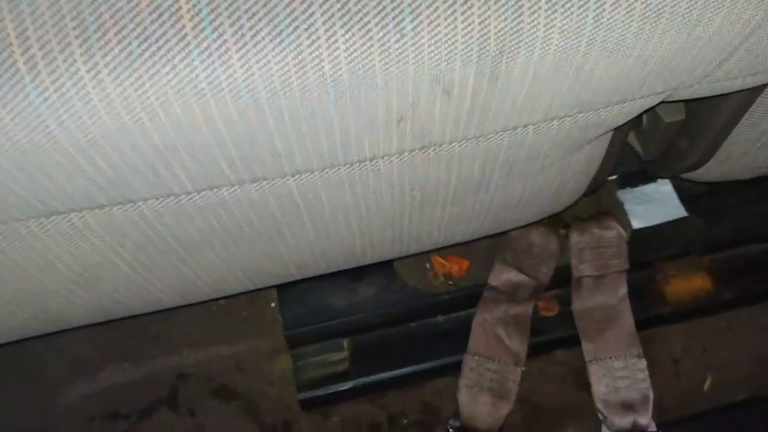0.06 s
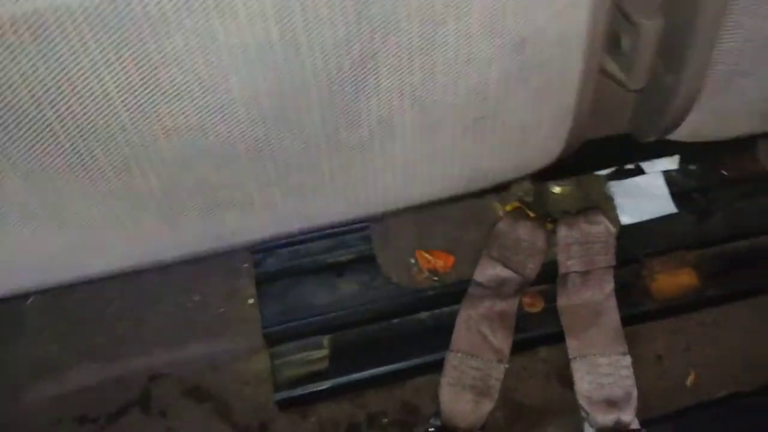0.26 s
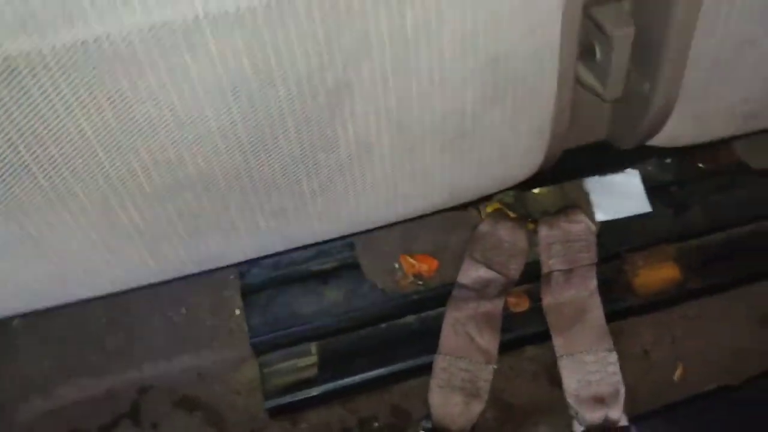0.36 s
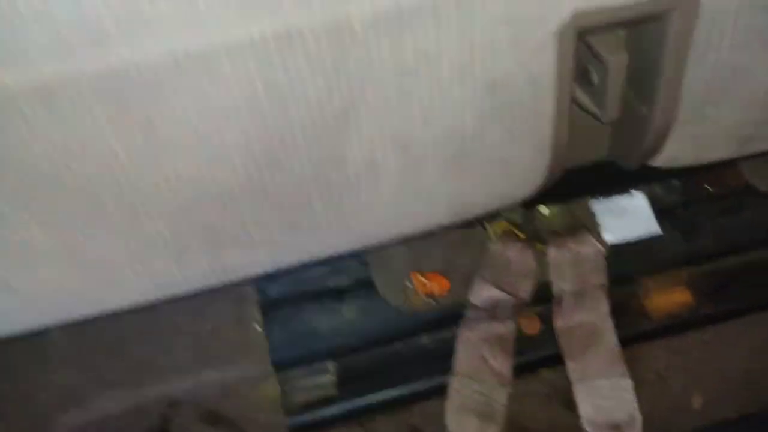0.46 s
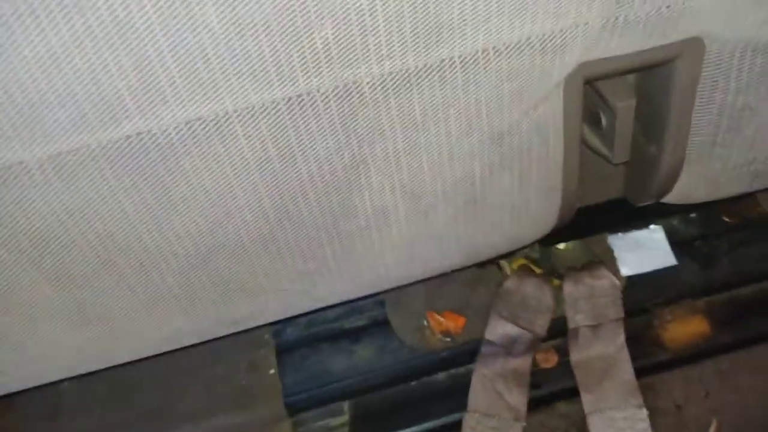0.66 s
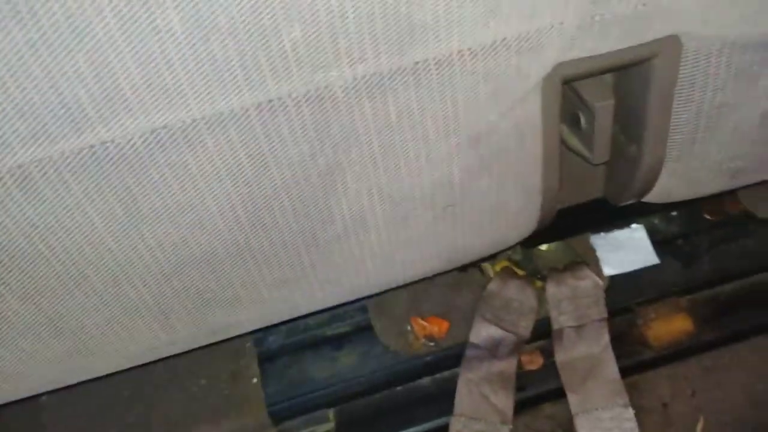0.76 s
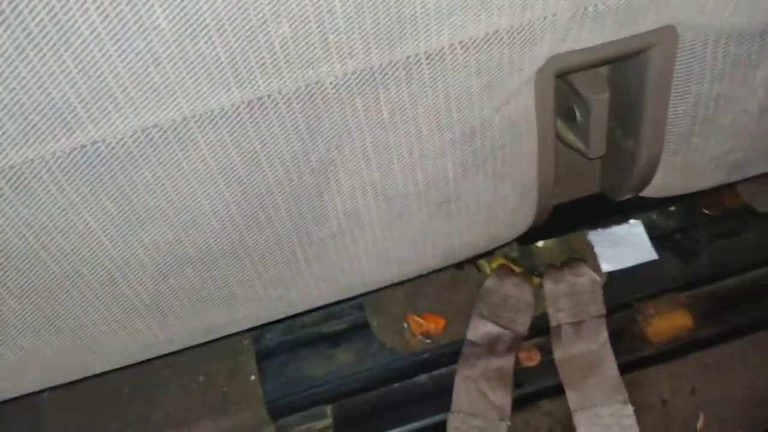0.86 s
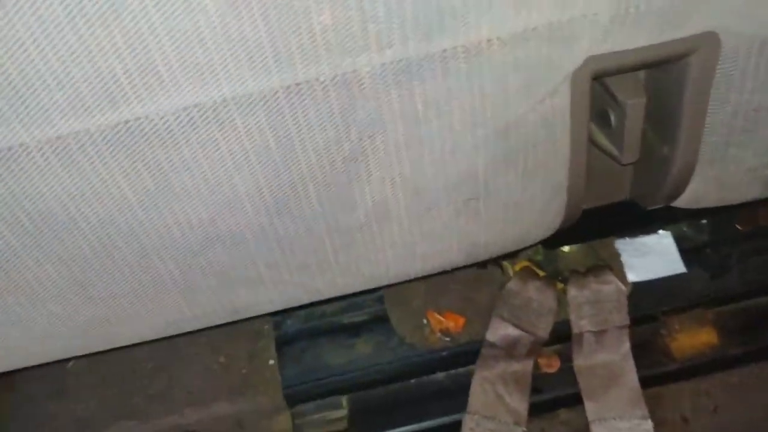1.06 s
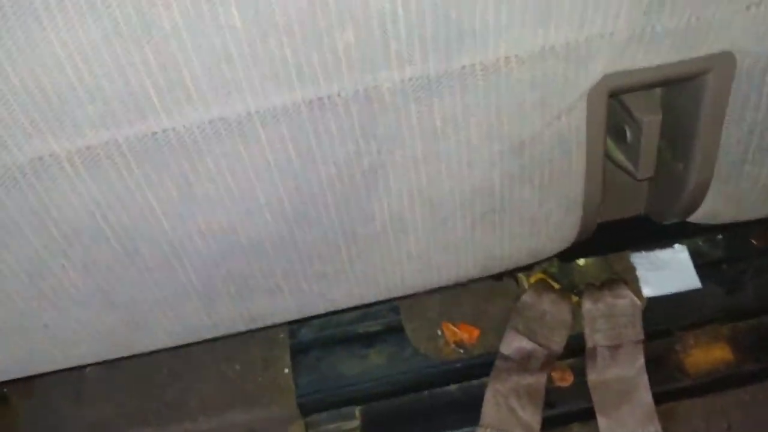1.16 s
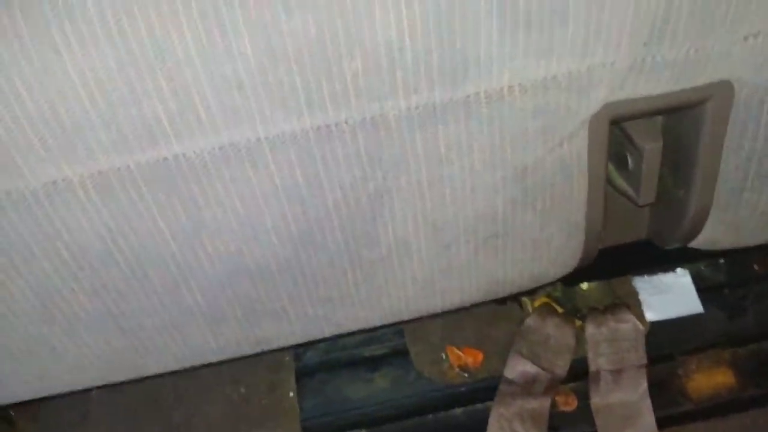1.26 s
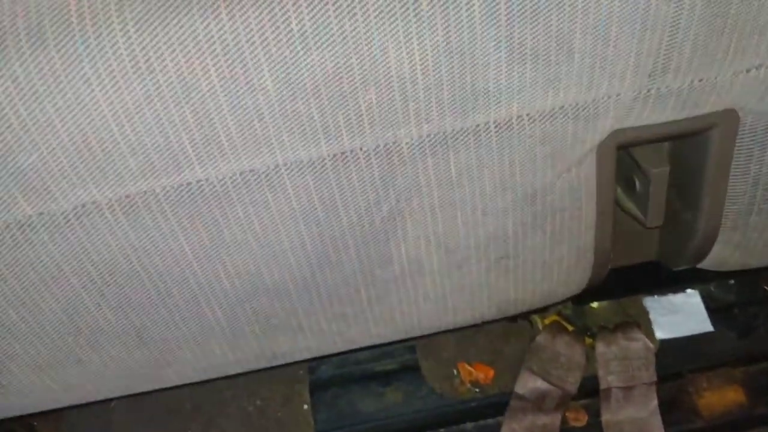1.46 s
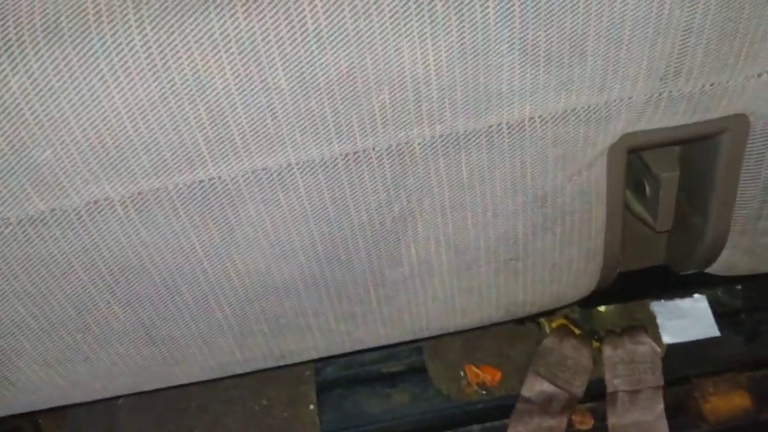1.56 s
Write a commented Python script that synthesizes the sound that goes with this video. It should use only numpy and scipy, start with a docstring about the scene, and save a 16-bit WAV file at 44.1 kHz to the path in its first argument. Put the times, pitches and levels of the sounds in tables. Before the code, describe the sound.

Close microphone inside a quiet vehicle cab: fabric rustles, then a seat bangs closed with clustered metallic clacks and a sagging bass thud, followed by faint rattles, muffled frame knocks, and a much softer bump with rustle.

```python
"""A vehicle cab, heard close up: a folding bench seat is pushed shut.
Upholstery slides as gated grains of noise; the steel latch snaps and clatters in noise cracks and modes.
The seat lands with sagging booms, and air pushes ring the resonances of the cab.
The springs chatter and sing, and the frame rocks with small knocks on ringing panels.
A second after the landing the cushion gives a soft thump and a rustle."""
import sys
import numpy as np
from scipy import signal
from scipy.fft import rfft, irfft
from scipy.io import wavfile

SR = 44100
rng = np.random.default_rng(int(sys.argv[2]) if len(sys.argv) > 2 else 0)


def output_pcm(signal):
    """Save a mono or channel-first signal as 16-bit PCM at the path in sys.argv[1].

    Samples are clipped to [-1, 1] before scaling.
    """
    pcm = np.clip(np.atleast_2d(signal).T, -1, 1) * 32767
    wavfile.write(sys.argv[1], SR, np.round(pcm).astype(np.int16))


N = 70560
T = np.arange(N) / SR
HZ = np.fft.rfftfreq(N, 1 / SR)


def amp(db):
    """Decibels to gain."""
    return 10 ** (np.asarray(db) / 20)


def unit(x):
    """Scales to rms 1."""
    return x / np.sqrt(np.mean(x ** 2) + 1e-20)


def read(points, hz):
    """Reads a table on a log-frequency axis."""
    f, value = np.transpose(points)
    return np.interp(np.log(hz + 1), np.log(f + 1), value)


def pan(left_over_right_db):
    """Gains of the left and right channel."""
    return amp([[left_over_right_db / 2], [-left_over_right_db / 2]])


def add(mix, start_s, sound):
    """Mixes a sound in from start_s on."""
    part = mix[:, max(round(start_s * SR), 0):]
    part += sound[..., :part.shape[1]]


def noise(colour_db, grain=1):
    """Coloured stereo noise of rms 1, most alike in the bass; grain breaks it into clicks."""
    # left-right likeness: (frequency [Hz], correlation [-1 to 1])
    alike = [(70, .88), (280, 0.85), (500, 0.05), (4000, 0.05), (10000, 0.4)]
    a, b = rfft(rng.standard_normal((2, N)) * grain)
    likeness = np.clip(read(alike, HZ), -1, 1)
    mid = a * np.sqrt(1 + likeness)
    side = b * np.sqrt(1 - likeness)
    return unit(irfft(np.array([mid + side, mid - side]) * amp(colour_db), N))


def decay(t60_s):
    """Exponential decay by 60 dB in t60_s."""
    return np.exp(-np.log(1000) * T / max(t60_s, 1e-3))


def fade(x, t60s):
    """Lets each band die at its own speed; t60s holds (frequency [Hz], t60 [s])."""
    f, t60 = np.transpose(t60s)
    spectrum = rfft(x)
    out = 0
    for band, band_t60 in zip(np.eye(len(f)), t60):
        weight = np.interp(np.log(HZ + 1), np.log(f), band)
        out = out + irfft(spectrum * weight, N) * decay(band_t60)
    return out


def swell(rise_s, t60_s):
    """Smooth rise, then exponential decay."""
    tail = np.exp(-np.log(1000) * np.maximum(T - rise_s, 0) / t60_s)
    return np.minimum(T / rise_s, 1) ** 2 * tail


def hump(rise_s, release_s):
    """A smooth swell that dies away completely."""
    phase = np.minimum(T / rise_s, 1) + np.clip((T - rise_s) / release_s, 0, 1)
    return np.sin(np.pi / 2 * phase) ** 2


def grains(per_s, spread_db):
    """Random snags, uneven in size if spread_db is not 0."""
    size = amp(abs(spread_db) * np.minimum(rng.exponential(1, N), 4))
    return (rng.random(N) < per_s / SR) * size


def ring(modes):
    """Decaying modes of a struck part, with a random phase in each channel."""
    out = 0
    for hz, db, t60_s in modes:
        phase = rng.random((2, 1))
        out = out + amp(db) * decay(t60_s) * np.sin(2 * np.pi * (hz * T + phase))
    return out


def room(x):
    """The short, dense tail of a small padded cab."""
    # tail decay: (frequency [Hz], t60 [s])
    room_t60 = [(200, 0.28), (3000, 0.15)]
    room_db, onset_s = -10, 0.017
    tail = fade(noise(0 * HZ), room_t60) * np.minimum(T / onset_s, 1)
    tail = tail / np.linalg.norm(tail[0])
    return x + amp(room_db) * signal.fftconvolve(x, tail, axes=1)[:, :N]


def quiet_air():
    """Steady coloured noise of the quiet air."""
    # air spectrum: (frequency [Hz], relative density [dB])
    air_colour = [(100, -5.5), (300, 3.5), (1200, -8), (8000, -19), (11000, -33), (15500, -25)]
    air_db = -63
    return amp(air_db) * noise(read(air_colour, HZ))


def upholstery():
    """Woven cloth slides in short strokes of tiny snags."""
    # strokes: (start [s], rise [s], release [s], level [dB], left over right [dB])
    strokes = [(0.12, 0.073, 0.41, -47, 6), (0.364, 0.024, 0.088, -56.5, -13),
               (0.485, 0.055, 0.078, -56, -1.5), (0.882, .12, 0.28, -68.5, 12),
               (1.222, 0.038, 0.077, -46, 5.5), (1.30, 0.06, 0.06, -58.5, 7),
               (1.481, 0.084, 0.059, -56, 4.5)]
    # cloth spectrum: (frequency [Hz], relative density [dB])
    fabric = [(350, -18), (600, 0), (1530, -10), (2150, -5.5), (7520, -9), (8990, -18.5), (10500, -44),
              (14100, -23.5)]
    fibres_per_s, grain_spread_db = 12000, 0
    out = np.zeros((2, N))
    for start_s, rise_s, release_s, db, side_db in strokes:
        rustle = noise(read(fabric, HZ), grains(fibres_per_s, grain_spread_db))
        add(out, start_s, amp(db) * pan(side_db) * hump(rise_s, release_s) * rustle)
    return out


def springs():
    """Loose springs sing on: faint, wavering tones of narrow-band noise."""
    # tones: (start [s], rise [s], release [s], pitch [Hz], level [dB])
    spring_tones = [(0.5, 0.059, 0.11, 425, -52), (0.6, 0.25, 0.21, 197, -50),
                    (0.6, 0.22, 0.69, 835, -72.5)]
    width_hz = 18
    out = np.zeros((2, N))
    for start_s, rise_s, release_s, hz, db in spring_tones:
        resonance_db = -20 * np.log10(1 + ((HZ - hz) / width_hz) ** 2)
        add(out, start_s, amp(db) * hump(rise_s, release_s) * noise(resonance_db))
    return out


def frame():
    """The springs chatter, then the frame rocks with muffled knocks that ring its panels."""
    # spring chatter: (start [s], rise [s], release [s], level [dB])
    chatters = [(0.36, 0.077, .065, -46.5), (0.45, 0.027, 0.22, -55)]
    # chatter spectrum: (frequency [Hz], relative density [dB])
    chatter_colour = [(200, -1), (450, -5), (1400, -0.5), (2800, -2.5), (4500, -24.5), (7800, -25.5),
                      (12000, -68)]
    # frame knocks: (time [s], level [dB], tilt [dB per octave])
    knocks = [(0.630, -47, 2.5), (0.701, -47, 2), (0.7693, -45.5, 2.5), (0.839, -51, 2), (1, -53, -4),
              (1.55, -54, -9)]
    # knock spectrum before the tilt: (frequency [Hz], relative density [dB])
    knock_colour = [(300, -1.5), (600, 8.5), (850, 3.5), (1350, -3), (1800, -18.5), (3000, -18),
                    (12000, -95)]
    # panel modes: (frequency [Hz], relative level [dB], t60 [s])
    panel = [(580, 7.5, 0.16), (738.6, 6.5, 0.2), (824, -4.5, 0.77)]
    chatter_per_s, chatter_spread_db = 1100, 1.5
    knock_t60_s, knock_rise_s, panel_db, knock_side_db = 0.16, 0.0019, -8, -4
    out = np.zeros((2, N))
    for start_s, rise_s, release_s, db in chatters:
        rattle = noise(read(chatter_colour, HZ), grains(chatter_per_s, chatter_spread_db))
        add(out, start_s, amp(db) * hump(rise_s, release_s) * rattle)
    for start_s, db, tilt in knocks:
        colour_db = read(knock_colour, HZ) + tilt * np.log2(HZ + 200)
        knock = decay(knock_t60_s) * noise(colour_db) + amp(panel_db) * ring(panel)
        onset = np.minimum(T / knock_rise_s, 1)
        add(out, start_s, amp(db) * pan(knock_side_db) * onset * knock)
    return out


def cushion():
    """The padded seat sways as level-shaped low noise and shudders in dull noise bursts."""
    # low shaking: (time [s], level [dB])
    sway = [(0, -56.5), (.23, -42), (.4, -26.5), (.62, -36), (.98, -44), (1.21, -54), (1.36, -49.5),
            (1.47, -57), (1.56, -45), (1.6, -58)]
    # shaking spectrum: (frequency [Hz], relative density [dB])
    sway_colour = [(25, -22), (50, -8), (76, 2), (140, -9), (270, -25.5), (480, -28), (1000, -38),
                   (2200, -87)]
    # shudders: (start [s], level [dB], rise [s], t60 [s])
    shudders = [(0.118, -38, 0.081, 0.43), (0.240, -16.5, 0.017, 0.45), (1.237, -37.5, 0.0091, 0.16)]
    # shudder spectrum: (frequency [Hz], relative density [dB])
    shudder_colour = [(50, -28.5), (85, -14), (140, 4.5), (220, -10), (350, -5.5), (550, -16.5),
                      (4000, -61)]
    out = noise(read(sway_colour, HZ)) * amp(np.interp(T, *np.transpose(sway)))
    for start_s, db, rise_s, t60_s in shudders:
        add(out, start_s, amp(db) * swell(rise_s, t60_s) * noise(read(shudder_colour, HZ)))
    return out


def settle():
    """The seat lands and flexes: deep booms whose pitch sags as they die."""
    # booms: (start [s], rise [s], t60 [s], first pitch [Hz], last pitch [Hz], sag time [s], level [dB])
    sags = [(0.238, .036, 0.5, 202, 72.34, .02, -4.5), (0.29, 0.04, 1, 225, 54.88, .15, -19.5)]
    out = np.zeros((2, N))
    for start_s, rise_s, t60_s, first_hz, last_hz, sag_s, db in sags:
        hz = last_hz + (first_hz - last_hz) * np.exp(-T / sag_s)
        # the decay reaches gain 1 where the rise ends
        envelope = np.minimum(T / rise_s, decay(t60_s) * amp(60 * rise_s / t60_s))
        add(out, start_s, amp(db) * envelope * np.sin(2 * np.pi * np.cumsum(hz) / SR))
    return out


def boom():
    """Each soft blow is a brief push and rebound of air, which sets the cab ringing."""
    # seat blows: (centre time [s], level [dB], pitch [Hz], share that rings the cab)
    thumps = [(0.2499, -15, 337, 0.9), (0.2545, -13, 190, 0.95), (0.2630, -17.5, 328.3, .8),
              (0.3122, -7.5, 90, 0.41), (0.437, -14.5, 78, 0.2), (0.56, -26, 71.1, 0.45),
              (0.774, -31.5, 84, 0.77), (1.2496, -32.5, 146, 0.046), (1.2582, -32, 334, 0.13),
              (1.271, -23.5, 112.4, 0.063)]
    # cab and seat panel resonances: (frequency [Hz], gain [dB], t60 [s])
    cab_modes = [(79, 1, 0.46), (120, -2.5, .45), (164.6, 5.5, 0.5), (194.1, 7, 0.38), (293, 1, 0.098),
                 (354, 8.5, 0.35), (425, -2, 0.4)]
    width_cycles = 0.99
    pushes, drive = np.zeros((2, N))
    for centre_s, db, hz, share in thumps:
        cycles = (T - centre_s) * hz
        push = -amp(db) * np.exp(-(cycles / width_cycles) ** 2) * np.cos(2 * np.pi * cycles)
        pushes = pushes + push
        drive = drive + share * push
    cab = 0
    for hz, db, t60_s in cab_modes:
        envelope = 2 * decay(t60_s) / decay(t60_s).sum()  # near unit gain at resonance
        cab = cab + amp(db) * envelope * np.cos(2 * np.pi * hz * T)
    return pushes + signal.fftconvolve(drive, cab)[:N]


def latch():
    """Steel parts clash several times: each a sharp, dense crack with a briefly ringing edge."""
    # latch and frame clacks: (time [s], level [dB], resonance of the struck part [Hz], base t60 [s])
    clacks = [(0.1246, -41, 4300, 0.079), (0.2356, -21, 8300, .02), (0.2373, -5, 7627, 0.062),
              (0.2432, -18, 4500, 0.045), (0.2497, -6, 2770, 0.035), (0.2520, -9.5, 2340, 0.05),
              (0.2592, -12, 1210, .04), (0.2642, -6.5, 2680, 0.021), (0.269, -28.5, 1430, 0.048),
              (0.2789, -15, 4407, 0.031), (0.3175, -34.5, 3100, .08), (0.357, -38.5, 5960, 0.049),
              (0.397, -44.5, 2840, 0.096), (0.482, -44, 2210, 0.122), (0.533, -42.5, 2010, 0.05),
              (0.746, -48, 4000, 0.033), (0.7695, -45.5, 801, 0.018), (1.246, -41, 1004, 0.037),
              (1.2512, -35, 1765, 0.021), (1.2595, -42, 4100, 0.038), (1.2765, -43, 5500, 0.032),
              (1.522, -54.5, 2500, 0.11)]
    # crack spectrum before resonance and tilt: (frequency [Hz], relative density [dB])
    clack_colour = [(120, -28), (200, -10.5), (350, -6), (470, -9.5), (1150, -12), (1600, -19.5),
                    (2500, -15.5), (5300, -23), (9000, -31), (11000, -47), (15500, -37)]
    # sustain: (frequency [Hz], factor on the base t60)
    clack_sustain = [(500, 1.6), (8000, .75)]
    # latch steel, damped by the upholstery: (frequency [Hz], relative level [dB])
    steel_modes = [(897, 2), (1172, 1), (2016, 1.5), (2502, -1.5), (3235, 2.5), (4560, 3)]
    rise_s, steel_db, steel_t60_s = .0012, -25, .09
    part_db, part_octaves = 5.5, 0.62
    # small parts sound brighter: dB per octave of tilt for each octave above neutral
    brightening, neutral_hz = 2.9, 2200
    out = np.zeros((2, N))
    for start_s, db, hz, t60_s in clacks:
        part = part_db * np.exp(-(np.log2((HZ + 1) / hz) / part_octaves) ** 2)
        tilt = brightening * np.log2(hz / neutral_hz) * np.log2(np.clip(HZ, 500, 9000))
        burst = noise(read(clack_colour, HZ) + part + tilt)
        crack = fade(burst, [(f, factor * t60_s) for f, factor in clack_sustain])
        steel = ring([(f, level, steel_t60_s) for f, level in steel_modes])
        onset = np.minimum(T / rise_s, 1)
        add(out, start_s, amp(db) * onset * (crack + amp(steel_db) * steel))
    return out


def scene():
    """All parts of the seat over quiet air; mids lean right, the highest treble left."""
    # stereo lean: (frequency [Hz], left over right [dB])
    lean = [(300, 1.5), (1500, -4.5), (4000, -6.5), (13000, 5.5)]
    mix = quiet_air() + upholstery() + springs() + frame() + cushion()
    mix = mix + settle() + boom() + room(latch())
    half_lean_db = read(lean, np.fft.rfftfreq(2 * N, 1 / SR)) / 2
    return irfft(rfft(mix, 2 * N) * amp([half_lean_db, -half_lean_db]))[:, :N]


def record(dry):
    """The microphone rounds off peaks at full scale; then the band limit."""
    edge_hz = 16100
    held = dry / (1 + dry ** 8) ** (1 / 8)
    low_pass = signal.firwin(511, edge_hz, window=("kaiser", 9), fs=SR)
    return signal.oaconvolve(held, low_pass[None], "same")


dry = scene()
out = record(dry)
output_pcm(out)
```